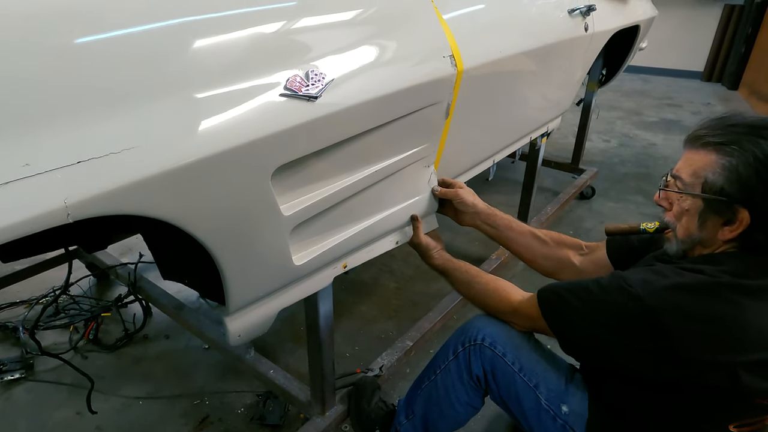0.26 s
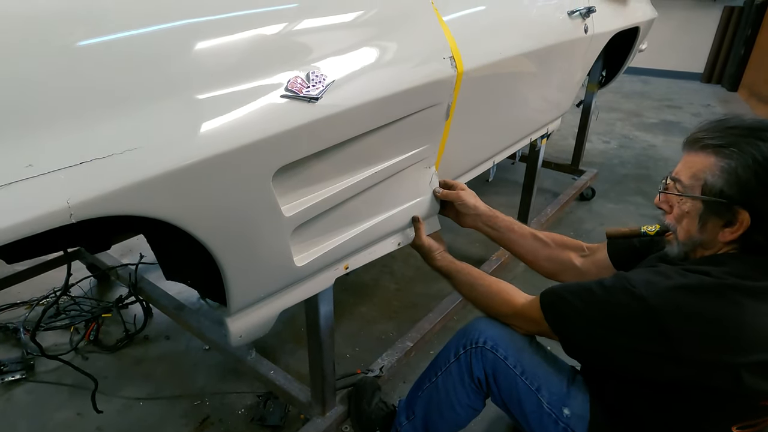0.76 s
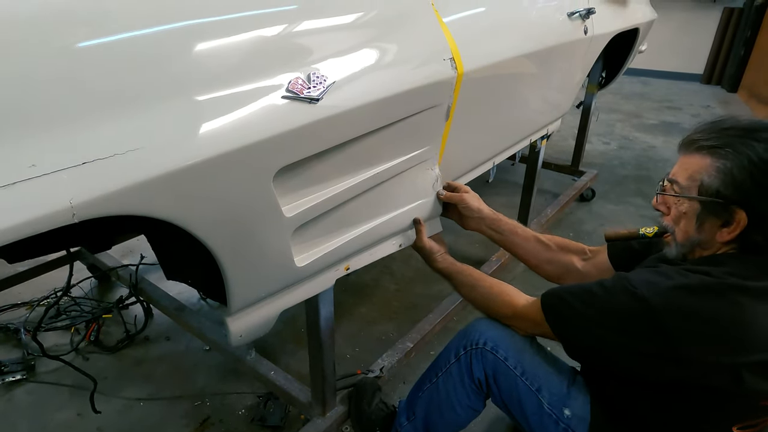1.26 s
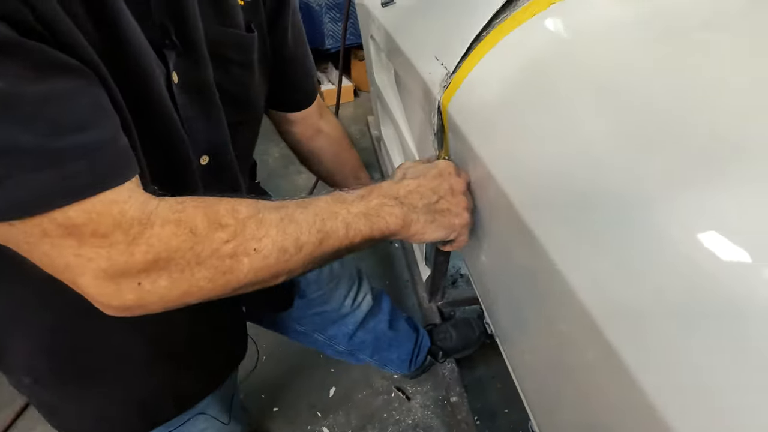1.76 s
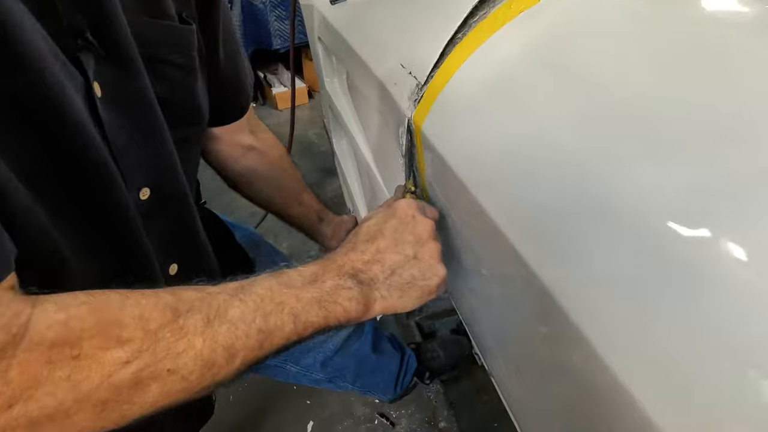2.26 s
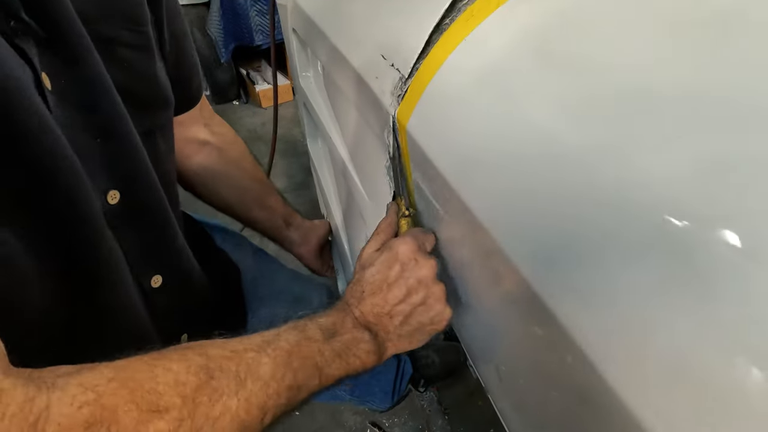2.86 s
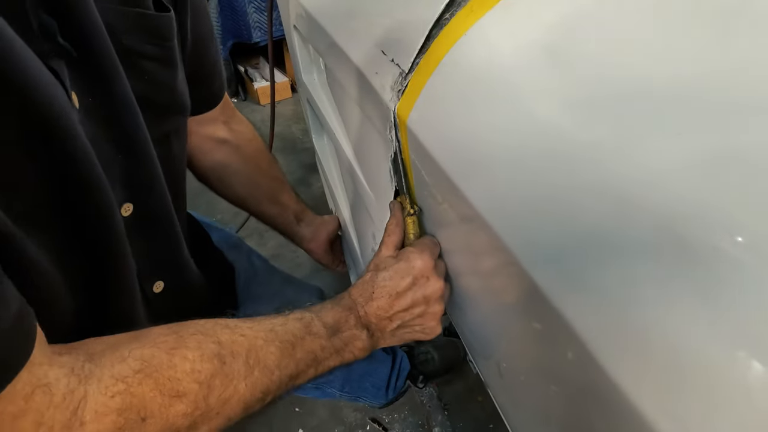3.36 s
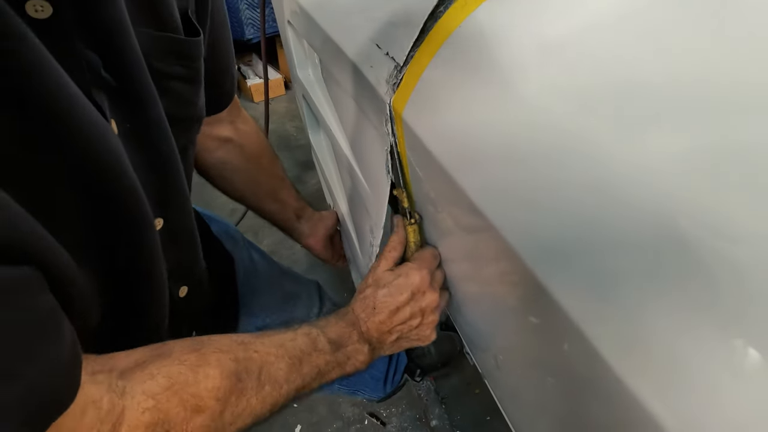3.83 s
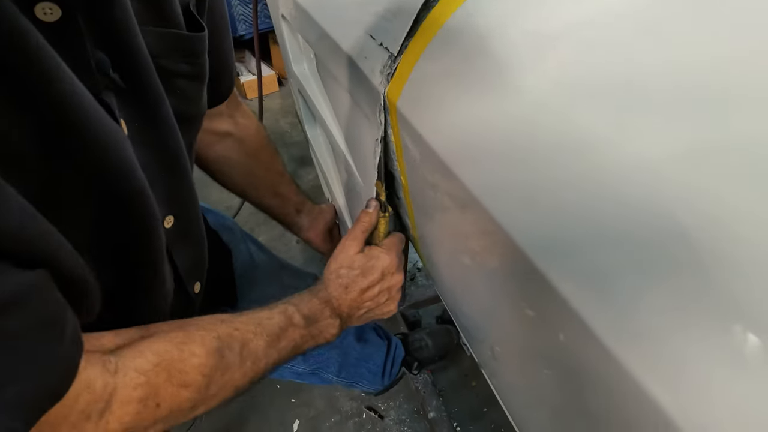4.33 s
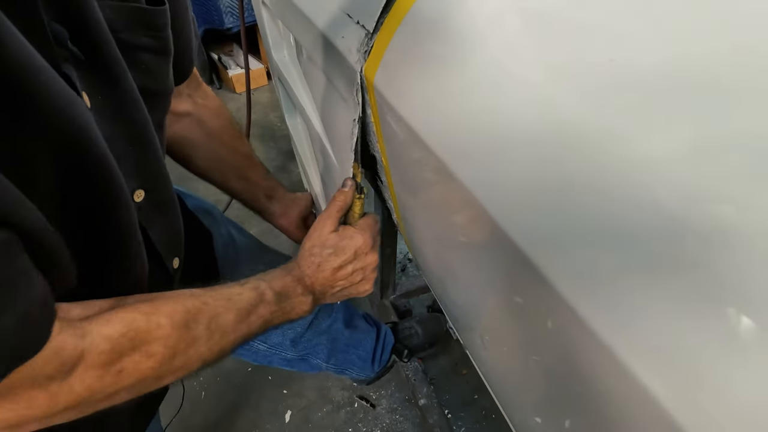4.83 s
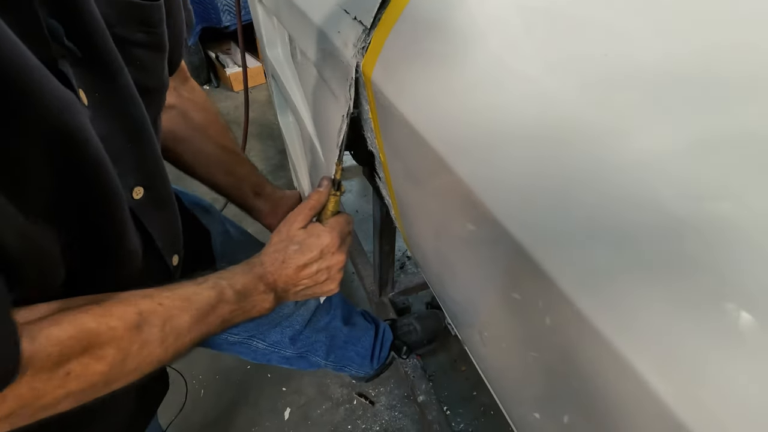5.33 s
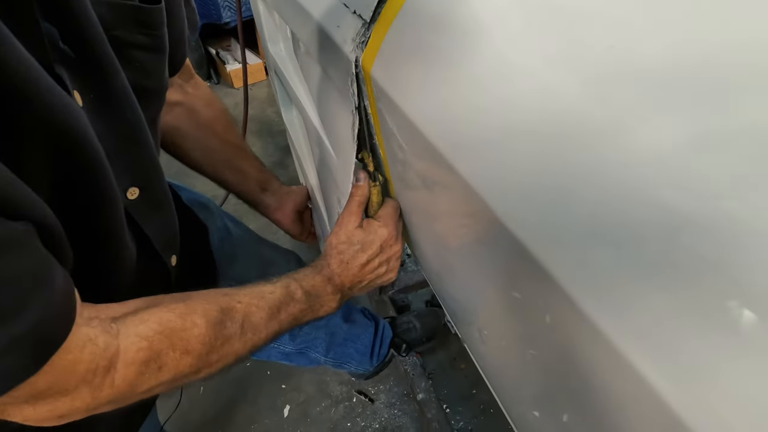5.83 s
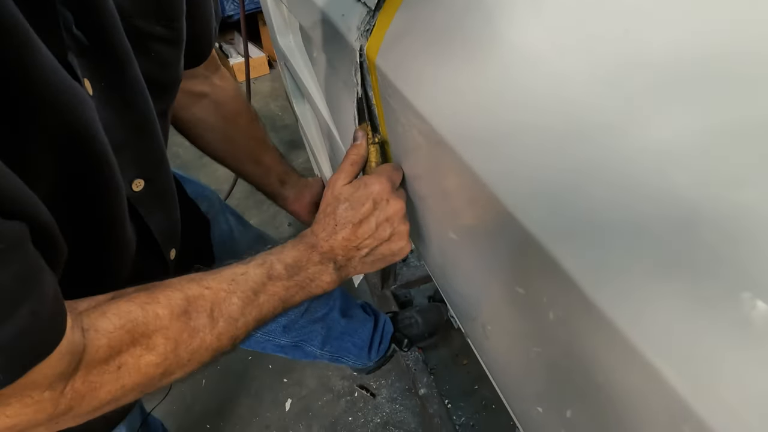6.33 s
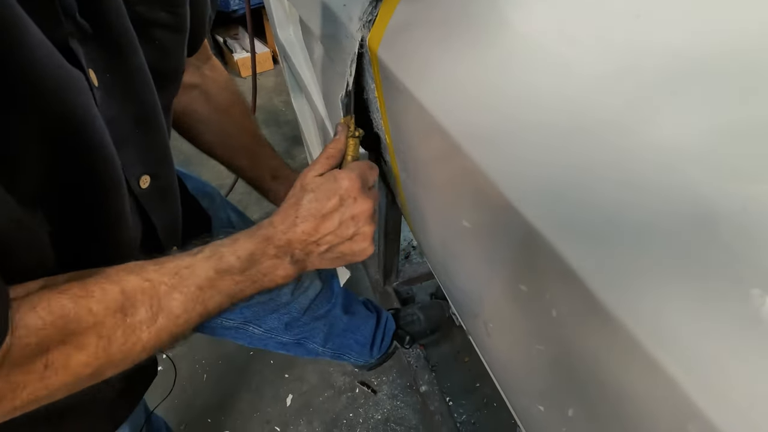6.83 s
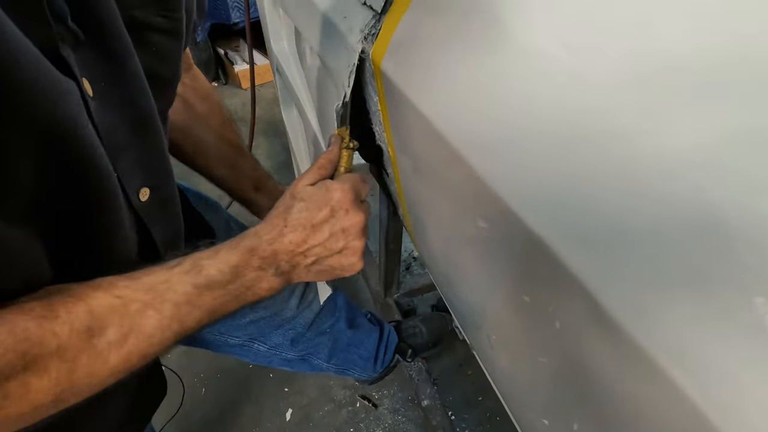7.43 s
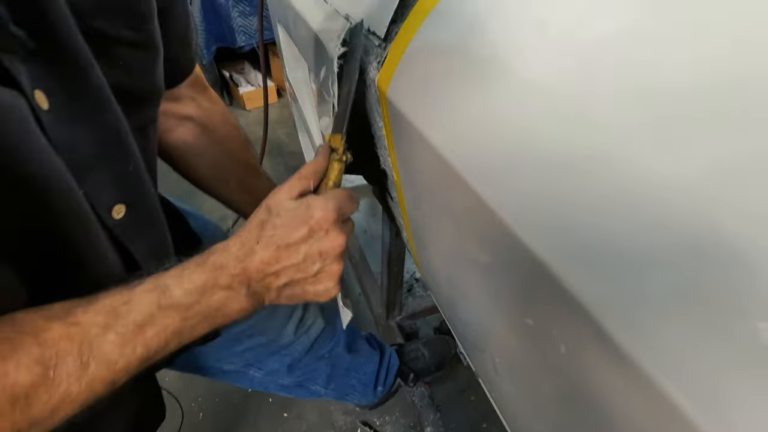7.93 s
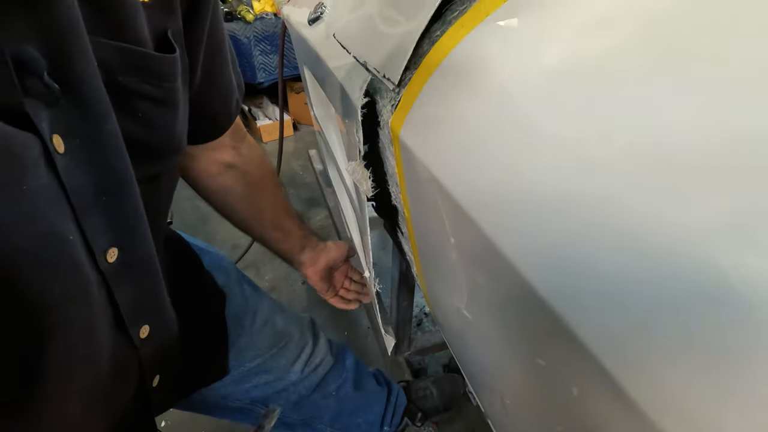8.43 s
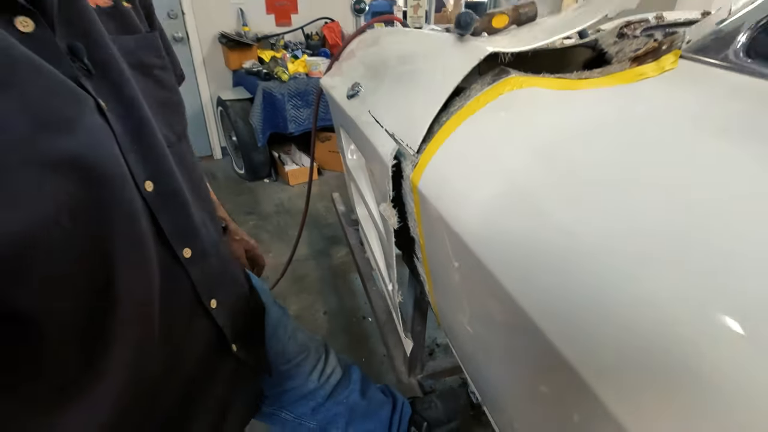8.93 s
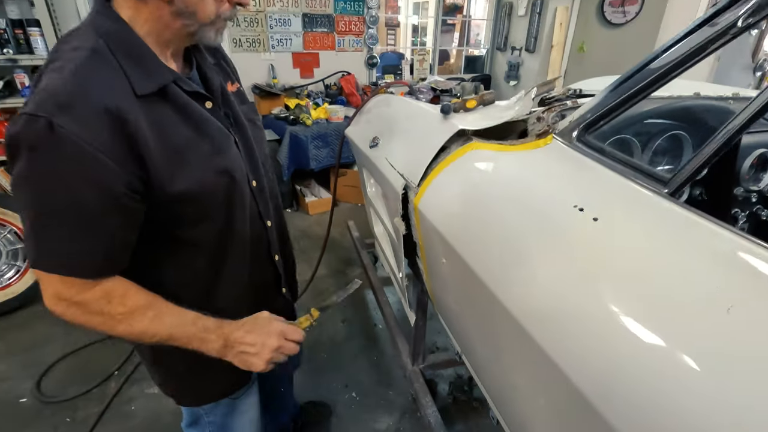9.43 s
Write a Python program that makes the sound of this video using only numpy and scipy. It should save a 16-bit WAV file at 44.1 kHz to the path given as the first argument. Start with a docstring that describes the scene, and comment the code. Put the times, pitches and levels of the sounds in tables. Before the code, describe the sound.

A glued fibreglass car panel is pulled by hand in a hard-floored workshop. First, rhythmic ripping cracks and dull shell knocks come from across the floor, cutting off abruptly. After a tiny silence the microphone is close: quiet creaks and fibre ticks, then hard dry snaps, more creaking, a violent break with hollow thumps, and finally soft cloth brushing, low room rumble and a faint climbing hum.

```python
"""Workshop: a glued fibreglass body panel is pried off along its seam. The first pulls are heard from across
the floor and break off abruptly at 1.46 s; after a brief silence the scene changes and the rest is close by.
Rips and frays are random fibre breaks; snaps, knocks and bright ticks are decaying shell modes plus coloured
noise; creaks are stick-slip impulses. Cloth strokes, room air with a steady machine line and, late on, a faint
climbing hum like a far engine."""
import sys
import numpy as np
from scipy import signal
from scipy.fft import rfft, irfft
from scipy.io import wavfile
from scipy.ndimage import uniform_filter1d

SR = 44100
rng = np.random.default_rng(int(sys.argv[2]) if len(sys.argv) > 2 else 0)


def to_wav(sig):
    """Store sig (one row per channel, or 1-D mono) as 16-bit WAV at the path in sys.argv[1].

    Samples outside -1..1 are clipped; the rate is SR.
    """
    pcm = np.clip(np.atleast_2d(sig), -1, 1) * 32767
    pcm = np.round(pcm).astype(np.int16)
    wavfile.write(sys.argv[1], SR, pcm.T)  # frames by channels


N = 426888
TIME = np.arange(N) / SR
RING = TIME[:SR // 3]  # time axis of one event
# shell registers: (low f/Hz, high f/Hz)
THUD, BODY, CRACK, SPLINTER = (130, 250), (250, 700), (700, 2500), (2500, 17000)
FAR_END_S, NEAR_START_S = 1.463, 1.495
# table levels are nominal: trims in the functions and the mix come on top


def undb(db):
    """Decibels to gain."""
    return 10 ** (np.asarray(db) / 20)


def unit(x):
    """Scale to rms 1."""
    return x / np.sqrt(np.mean(x ** 2))


def crest(x):
    """Scale so that the loudest 4 ms have rms 1."""
    return x / np.sqrt(uniform_filter1d(x ** 2, size=176).max())


def band(x, edges_hz):
    """Causal band-pass: low registers answer later, as bending waves do."""
    return signal.sosfilt(signal.butter(3, edges_hz, "band", fs=SR, output="sos"), x)


def tint(x, colour):
    """Filter x by a gain curve of (f/Hz, level/dB) points, linear in log f."""
    hz, db = np.transpose(colour)
    bins_hz = np.maximum(np.fft.rfftfreq(len(x), 1 / SR), 1)
    gain = undb(np.interp(np.log(bins_hz), np.log(hz), db))
    return irfft(rfft(x) * gain, len(x))


def fade(t_s, t60_s):
    """Exponential decay, 60 dB down after t60_s."""
    return np.exp(-np.log(1000) * t_s / t60_s)


def surge(t_s, length_s, swell_share):
    """Load that builds up exponentially until t = 0, then dies away; length_s = sum of both time constants."""
    return np.exp(np.minimum(t_s / swell_share, -t_s / (1 - swell_share)) / length_s)


def add(out, start_s, x):
    """Mix x into out from start_s on."""
    start = int(start_s * SR)
    x, start = x[max(-start, 0):], max(start, 0)
    out[start:start + len(x)] += x[:N - start]


def fractures(count, per_s, spread_db):
    """Random tiny breaks: many small, a few large."""
    size = undb(spread_db * np.minimum(rng.exponential(size=count), 4))
    hits = rng.random(count) < per_s / SR
    return hits * size * rng.choice([-1, 1], count)


def wander():
    """Slow chance with spread 1."""
    return unit(tint(rng.standard_normal(N), [(1, 0), (8, 0), (30, -80)]))


# room noise colour: f/Hz, level/dB
ROOM_COLOUR = [(15, -42), (25, -4.5), (64, 4.5), (130, -0.5), (256, -6), (354, -15.5), (416, -9),
               (489, -15.5), (1940, -26), (3340, -32), (5430, -33), (8140, -39), (11900, -37.5),
               (16000, -51)]
# steady machine lines: f/Hz, rms level/dB
MACHINE_LINES = [(86.1, -63.5)]


def air():
    """Uneven low rumble and thin hiss of the room, with a steady machine line."""
    lines = 0
    for hz, db in MACHINE_LINES:
        lines = lines + undb(db) * np.sqrt(2) * np.sin(2 * np.pi * (hz * TIME + rng.random()))
    noise = unit(tint(rng.standard_normal(N), ROOM_COLOUR))
    return undb(-56 + 0.86 * wander()) * noise + lines


# glue line rips: t/s of load peak, splinter level/dB, depth/dB = body re splinter, load length/s
GLUE_RIPS = [(0.009, -26.5, 6.5, 0.039), (0.226, -35.5, 9, 0.035), (0.479, -33, 5.5, 0.016),
             (0.702, -19.5, 9.5, 0.017), (0.96, -28, 3.5, 0.013), (1.207, -19, 10, 0.019),
             (1.442, -21, 13.5, 0.015), (2.362, -33, 9, 0.017), (4.338, -46.5, 13, 0.018),
             (4.576, -38.5, 11.5, 0.032), (4.986, -37, 4, 0.028), (5.026, -33, 11, 0.026),
             (5.17, -39, 4.5, 0.02), (5.365, -31.5, 8, 0.034), (5.421, -41.5, 22.5, 0.016),
             (5.603, -40, -5, 0.05), (7.037, -35.5, -2, 0.02), (7.064, -38.5, -0.5, 0.032),
             (7.251, -31, -3.5, 0.029), (7.434, -28, -2, 0.029), (7.589, -26, -2, 0.029),
             (7.761, -14.5, -2.5, 0.025), (7.794, -35, 24, 0.023), (7.959, -39.5, 25, 0.035)]
# fibre break colour: f/Hz, level/dB
FIBRE_COLOUR = [(120, -31.5), (200, 3), (558, -8.5), (659, -3), (777, -8), (1300, 4.5), (1650, 3),
                (2290, -4.5), (2650, -8.5), (3020, -9), (4600, -7.5), (8420, -17.5), (12200, -18),
                (16000, -30)]
RIP_SWELL_SHARE = 0.46  # part of the load length spent building up
RIP_CRACK_SHARE = 0.64  # part of the depth that also lifts the crack register


def rips(start_s, end_s):
    """Crack runs along the glue: an avalanche of fibre breaks swells and dies; a deep one shakes the shell too."""
    out, t_s = np.zeros(N), RING - RING[-1] / 2
    for s, db, depth_db, length_s in GLUE_RIPS:
        if start_s <= s < end_s:
            fibres = tint(fractures(len(t_s), per_s=3200, spread_db=4.5), FIBRE_COLOUR)
            fibres = fibres * surge(t_s, length_s, RIP_SWELL_SHARE)
            registers = [(SPLINTER, -1.5), (CRACK, RIP_CRACK_SHARE * depth_db - 2.5), (BODY, depth_db - 5)]
            rip = sum(undb(db + rel_db) * crest(band(fibres, edges)) for edges, rel_db in registers)
            add(out, s + t_s[0] + .003, rip)
    return out


# large piece gives way: t/s, level/dB
PANEL_FLEXES = [(0.064, -28), (1.207, -25), (1.44, -22), (4.789, -19.5), (5.187, -31.5), (5.386, -29),
                (7.766, -16.5), (7.934, -23), (8.019, -22)]
# slowest bending modes of the panel: nominal f/Hz, level/dB, t60/s
BENDING_MODES = [(50.5, -14.5, 0.14), (90.4, -6, 0.26), (119.3, 2, 0.18)]


def flexes(start_s, end_s):
    """Whole panel springs back in its bending modes, each pitch varied per event."""
    out = np.zeros(N)
    for s, db in PANEL_FLEXES:
        if start_s <= s < end_s:
            flex = 0
            for hz, mode_db, t60_s in BENDING_MODES:
                varied_hz = hz * rng.uniform(0.99, 1.2)
                flex = flex + undb(mode_db) * fade(RING, t60_s) * np.sin(2 * np.pi * varied_hz * RING)
            add(out, s, undb(db) * crest(flex))
    return out


# shell modes before register damping: f/Hz, level/dB, t60/s
SHELL_MODES = [(202.8, 3.5, 0.4), (238, -2, 0.42), (333, -5, 0.063), (399.8, 3.5, 0.41), (497, 0, 0.24),
               (620, -7.5, 0.023), (684, -3.5, 0.068), (928, -9.5, 0.54), (1054, -1.5, 0.97),
               (1230, -8, 0.44), (1430, -7.5, 0.052), (1517, 3.5, 0.23), (1540, -10, 0.096),
               (1760, 3.5, 0.27), (2025, -7, 0.13), (2200, -8, 0.12)]
MODE_RINGS = np.array([undb(db) * fade(RING, t60_s) * np.sin(2 * np.pi * hz * RING)
                       for hz, db, t60_s in SHELL_MODES])
# colour of the dense short modes: f/Hz, level/dB
THICKET_COLOUR = [(29, -37), (50, -12), (408, 3.5), (630, -6.5), (802, -9.5), (1300, -7.5), (1430, -21.5),
                  (1620, -9.5), (2750, -14), (2950, -17.5), (5270, -15), (9410, -25), (11700, -24.5),
                  (14200, -26), (16000, -38)]


def blow(registers, modes_db, contact_hz, spot_hz=6060.0, spot_db=-4.0, spot_t60_s=0.037):
    """One blow on the shell: main modes over a thicket of short ones; registers = (edges/Hz, level/dB, t60/s)."""
    contact = signal.butter(2, contact_hz, fs=SR, output="sos")
    # each blow starts every mode with a random sign, at nearly equal strength
    strengths = rng.uniform(0.99, 1, len(MODE_RINGS)) * rng.choice([-1, 1], len(MODE_RINGS))
    modes = signal.sosfilt(contact, strengths @ MODE_RINGS)
    # the spot struck has a short ring of its own
    spot = np.sin(2 * np.pi * spot_hz * RING) * fade(RING, spot_t60_s)
    thicket = signal.sosfilt(contact, tint(rng.standard_normal(len(RING)), THICKET_COLOUR))
    out = 0
    for edges, db, t60_s in registers:
        part = crest(band(thicket * fade(RING, t60_s), edges))
        part = part + undb(spot_db) * band(spot, edges)
        if edges != SPLINTER:
            part = part + undb(modes_db) * crest(band(modes * fade(RING, 2.6 * t60_s), edges))
        out = out + undb(db) * crest(part)
    return out


# loose shell bumps: t/s, body level/dB, crack re body/dB, spot ring f/Hz
SHELL_KNOCKS = [(0.066, -20.5, -20, 203), (0.125, -28.5, -4, 675), (0.392, -31, -1, 653),
                (0.634, -28.5, 1.5, 647), (0.872, -31, 1, 659), (0.965, -20.5, -37, 213),
                (1.037, -27, 7, 317), (1.074, -25, -2.5, 303), (1.289, -27.5, 3, 250),
                (1.34, -29, -1.5, 525), (1.54, -42, -15, 230), (1.707, -41, -7.5, 206),
                (2.666, -42.5, -3, 335), (3.051, -42.5, -14, 218), (3.75, -36.5, -9, 642),
                (3.96, -37.5, -0.5, 508), (5.723, -39, -4.5, 229), (5.814, -36.5, -4, 298),
                (6.054, -37.5, -10.5, 300), (6.153, -43, -4, 213), (6.326, -34, 1.5, 310),
                (7.441, -32.5, -0.5, 360), (7.822, -18.5, -1.5, 252), (7.85, -20, -6, 260),
                (7.897, -25, -3, 270), (7.936, -8, -19, 443), (7.959, -9.5, -12.5, 312), (8, -18, -11, 470),
                (8.026, -22.5, -10.5, 191), (8.045, -25.5, -8, 185), (8.265, -29.5, -2, 360),
                (9.149, -48.5, -7, 303)]
# a slack spot rings low and thuds, a stiff one hardly does; thud re body
SLACK_HZ, STIFF_HZ, SLACK_THUD_DB, STIFF_THUD_DB = 198, 292, 1.5, -11


def knocks(start_s, end_s):
    """Dull, low-passed blows of the loose shell."""
    out = np.zeros(N)
    for s, db, crack_db, spot_hz in SHELL_KNOCKS:
        if start_s <= s < end_s:
            thud_db = np.interp(spot_hz, [SLACK_HZ, STIFF_HZ], [SLACK_THUD_DB, STIFF_THUD_DB])
            registers = [(THUD, db + thud_db, .13), (BODY, db - 2.5, .1), (CRACK, db + crack_db - 4.5, .07)]
            add(out, s, blow(registers, modes_db=-7, contact_hz=825,
                             spot_hz=spot_hz, spot_db=6.0, spot_t60_s=0.086))
    return out


# thick fibres part one by one: t/s, splinter level/dB
FIBRE_TICKS = [(0.201, -29), (0.23, -26.5), (0.438, -36), (0.451, -36), (0.462, -33), (0.567, -40),
               (0.687, -25), (0.995, -37), (1.191, -21.5), (1.98, -45), (2.065, -43.5), (2.576, -51.5),
               (2.828, -46), (2.849, -44.5), (2.883, -48), (3.122, -41), (3.285, -46.5), (3.423, -42),
               (3.863, -43.5), (3.915, -38.5), (3.942, -41), (4.306, -33), (4.527, -39.5), (4.58, -29),
               (4.592, -25), (4.775, -29), (4.785, -22.5), (4.879, -35.5), (4.924, -41.5), (5.018, -32),
               (5.145, -34.5), (5.583, -32.5), (7.028, -35.5), (7.059, -29), (7.113, -41.5), (7.18, -36),
               (7.186, -38), (7.223, -34), (7.546, -41), (7.672, -34.5), (7.692, -39.5), (7.937, -31.5),
               (7.958, -30.5)]


def ticks(start_s, end_s):
    """Single fibre breaks: short bright blows without thud or body."""
    out = np.zeros(N)
    for s, db in FIBRE_TICKS:
        if start_s <= s < end_s:
            registers = [(CRACK, db - 6, .035), (SPLINTER, db - .8, .02)]
            add(out, s, blow(registers, modes_db=2.5, contact_hz=16200))
    return out


# bond lets go: t/s, crack level/dB, body re crack/dB, splinter re crack/dB, spot ring f/Hz
BOND_SNAPS = [(0.701, -17, -2.5, -5.5, 1195), (1.202, -15, 7, -15, 2100), (1.225, -20.5, 4.5, -4.5, 2010),
              (1.44, -17, 3, -20, 930), (1.905, -27, -0.5, -4, 1070), (2.019, -34.5, -0.5, -8.5, 1830),
              (2.354, -23.5, 0.5, -3.5, 2030), (2.774, -28, -4, 0, 1730), (4.154, -35, 5, -0.5, 1465),
              (4.274, -14.5, -7.5, -7.5, 1637), (4.372, -34, -1, -1, 1970), (4.563, -22.5, -2, -5.5, 1680),
              (4.792, -10.5, 2.5, -9, 1528), (5.036, -21.5, -0.5, -5, 2010), (5.186, -13, 6, -8, 1630),
              (5.223, -11, 0.5, -7.5, 1905), (5.389, -12.5, 0, -2.5, 1634), (5.601, -36, -2, 10, 1670),
              (6.386, -36, 7, -8.5, 1595), (6.886, -32.5, -9.5, -5.5, 1790), (7.761, -12, -3.5, -9, 1230),
              (7.769, -11, 6, -6.5, 1236), (7.781, -13.5, -8, -6.5, 1710), (7.79, -7.5, -8, -4, 1680)]
# thud re crack: the whole panel is heard from afar, only the seam from close by
FAR_THUD_DB, NEAR_THUD_DB = -3, -21.5
# a violent snap is damped by the break it makes: factors on crack and splinter t60
WEAK_SNAP_DB, STRONG_SNAP_DB, WEAK_RING, STRONG_RING = -31.5, -16, 1.1, .8


def snaps(start_s, end_s, thud_db):
    """Bond breaks as a full-range blow; frayed fibres keep parting for a moment after."""
    out = np.zeros(N)
    for s, db, body_db, splinter_db, spot_hz in BOND_SNAPS:
        if start_s <= s < end_s:
            ring = np.interp(db, [WEAK_SNAP_DB, STRONG_SNAP_DB], [WEAK_RING, STRONG_RING])
            registers = [(THUD, db + thud_db, 0.09), (BODY, db + body_db - 3.5, 0.11),
                         (CRACK, db - .3, 0.048 * ring), (SPLINTER, db + splinter_db - .3, 0.035 * ring)]
            add(out, s, blow(registers, modes_db=-4, contact_hz=16700,
                             spot_hz=spot_hz, spot_db=5.5, spot_t60_s=0.03))
            fray = tint(fractures(len(RING), per_s=300, spread_db=3.0), FIBRE_COLOUR)
            fray = crest(band(fray, (900, SPLINTER[1])) * fade(RING, .25))
            add(out, s, undb(db + splinter_db - 15) * fray)
    return out


# pushes bend the shell and rub it along the seam: t/s of peak, body level/dB, load length/s
SEAM_PUSHES = [(1.083, -42.5, .08), (2.043, -45, 0.15), (2.303, -45, .04), (2.675, -55.5, 0.33),
               (2.829, -39.5, 0.12), (3.08, -48, 0.053), (3.276, -43, 0.13), (3.432, -42.5, 0.043),
               (3.575, -46.5, 0.042), (3.925, -36.5, .12), (4.14, -43, 0.025), (5.115, -37.5, .05),
               (5.723, -44, .07), (5.967, -49.5, 0.2), (6.226, -41, 0.13), (6.364, -37.5, 0.05),
               (6.495, -46, .14), (7.145, -45.5, 0.046), (7.27, -42.5, 0.12), (7.68, -38, 0.054),
               (8.387, -46, .1)]
# stick-slip colour: f/Hz, level/dB
SLIP_COLOUR = [(88, -43), (150, -1), (328, -1), (422, -4.5), (466, -10), (689, -10), (805, -15),
               (1190, -18), (1660, -11), (2180, -21.5), (4860, -27), (9820, -34.5), (14500, -33),
               (16000, -26)]
PUSH_SWELL_SHARE = 0.53  # part of the load length spent building up
CREAK_CRACK_DB, CREAK_SPLINTER_DB, CRACKLE_DB = -8.5, -14.5, -20  # re creak body


def creaks():
    """Stick-slip of seam, blade and hand on the straining shell, and fine fibre crackle, both following the push."""
    slips = tint(fractures(N, per_s=650, spread_db=4), SLIP_COLOUR)
    catch_ring = rng.standard_normal(len(RING)) * fade(RING, .02)

    def rung(x, edges):
        """Let each break ring briefly, limited to a band."""
        return unit(band(signal.fftconvolve(x, catch_ring)[:N], edges))

    body, crack = unit(band(slips, (170, 700))), unit(band(slips, CRACK))
    splinter = rung(slips, SPLINTER)
    crackle = rung(tint(fractures(N, per_s=110, spread_db=1.5), FIBRE_COLOUR), (1200, SPLINTER[1]))
    effort = sum(undb(db - 3.5) * surge(TIME - s, length_s, PUSH_SWELL_SHARE) for s, db, length_s in SEAM_PUSHES)
    return effort * (body + undb(CREAK_CRACK_DB) * crack + undb(CREAK_SPLINTER_DB) * splinter
                     + undb(CRACKLE_DB) * crackle)


# sleeve brushes the shirt: t/s of peak, level/dB, half length/s (to 1/e)
SLEEVE_STROKES = [(1.77, -68, 0.49), (2.29, -67, 0.16), (6.236, -61, 0.099), (6.496, -58.5, 0.019),
                  (8.396, -60, 0.029), (8.666, -63.5, 0.028), (8.936, -62.5, 0.046)]
# cloth colour: f/Hz, level/dB
CLOTH_COLOUR = [(590, -16), (1000, 10.5), (1870, -10), (2100, -3), (3980, -8), (13100, -37), (14200, -18),
                (16000, -25)]


def sleeve():
    """Soft strokes of cloth on cloth: dense tiny impulses under Gaussian envelopes."""
    threads = tint(fractures(N, per_s=4000, spread_db=3), CLOTH_COLOUR)
    threads = unit(band(threads, (1300, SPLINTER[1])))
    return threads * sum(undb(db) * np.exp(-((TIME - s) / half_s) ** 2) for s, db, half_s in SLEEVE_STROKES)


# two hum climbs, each a list of: t/s, f/Hz, rms level/dB
HUM_CLIMBS = [
    [(7.05, 110.9, -62), (7.06, 110.5, -62), (7.216, 115.2, -48.5), (7.5, 121.6, -52)],
    [(8.45, 120.7, -56), (8.562, 134.2, -54), (8.716, 135, -50.5), (9.68, 156.7, -60)],
]
HUM_EDGE_S, HUM_WAVER_DB, HUM_DB = 0.28, 2.3, -0.5


def hum():
    """One low sine line that climbs slowly, wavers and fades in and out."""
    out = 0
    for climb in HUM_CLIMBS:
        s, hz, db = np.transpose(climb)
        gate = np.clip(1 + np.minimum(TIME - s[0], s[-1] - TIME) / HUM_EDGE_S, 0, 1)
        phase = 2 * np.pi * np.cumsum(np.interp(TIME, s, hz)) / SR
        out = out + gate * undb(np.interp(TIME, s, db)) * np.sin(phase)
    return np.sqrt(2) * undb(HUM_DB + HUM_WAVER_DB * wander()) * out


# reflections off floor and car body: lag/ms, level/dB
REFLECTIONS = [(2.6, -19), (4.3, -18), (7.1, -16), (11.2, -18.5)]


def mirrored(x):
    """Nearby hard surfaces send the treble back a few milliseconds later."""
    bright = band(x, (CRACK[0], SPLINTER[1]))
    out = x.copy()
    for lag_ms, db in REFLECTIONS:
        add(out, lag_ms / 1e3, undb(db) * bright)
    return out


def workshop(x, wet_db, low_t60_s, mid_t60_s, high_t60_s):
    """Diffuse echo, as the large panel radiates differently in every direction:
    each half octave stores the energy it is fed and gives it back as fading noise."""
    edges_hz = 44 * 2 ** (np.arange(18) / 2)
    noise, out = rng.standard_normal(N), x
    gather = np.exp(-1 / (0.0018 * SR))  # first reflections take milliseconds to gather
    for low, high in zip(edges_hz, edges_hz[1:]):
        t60_s = np.interp(np.log(low), np.log([150, 1200, 8000]), [low_t60_s, mid_t60_s, high_t60_s])
        keep = fade(1 / SR, t60_s) ** 2
        stored = signal.lfilter([1 - keep], [1, -keep], band(x + 1e-9, (low, high)) ** 2)
        stored = signal.lfilter([1 - gather], [1, -gather], stored)
        out = out + undb(wet_db) * np.sqrt(stored) * unit(band(noise, (low, high)))
    return out


def strikes(start_s, end_s, thud_db):
    """All timed panel events between two times."""
    return (rips(start_s, end_s) + flexes(start_s, end_s) + knocks(start_s, end_s)
            + ticks(start_s, end_s) + snaps(start_s, end_s, thud_db))


# effect of the way across the floor: f/Hz, level/dB
DISTANCE_COLOUR = [(150, 3), (400, 0), (1200, -1), (1900, -2), (5000, -6), (9000, 5), (13000, -6.5),
                   (16000, -5)]


def scene():
    """Pulling by hand from afar; after a brief silence the scene changes to prying close by."""
    rubbing = creaks()
    pulls = tint(strikes(0, FAR_END_S, FAR_THUD_DB) + rubbing, DISTANCE_COLOUR)
    far = workshop(mirrored(pulls), wet_db=-12, low_t60_s=0.44, mid_t60_s=0.54, high_t60_s=0.65)
    far_noise = undb(-51.0) * unit(tint(rng.standard_normal(N), SLIP_COLOUR))
    far = far + far_noise + undb(3.5) * air()
    work = strikes(NEAR_START_S, np.inf, NEAR_THUD_DB) + rubbing + sleeve()
    near = workshop(mirrored(work), wet_db=-15.0, low_t60_s=0.66, mid_t60_s=0.68, high_t60_s=0.79)
    near = near + undb(2.0) * air() + hum()
    before = uniform_filter1d(1. * (TIME < FAR_END_S), size=64)
    after = uniform_filter1d(1. * (TIME > NEAR_START_S), size=64)
    return (far * before + near * after)[None]


def record(dry):
    """The deepest bass is lost, the loudest peaks are rounded and the top is cut."""
    lean = signal.sosfilt(signal.butter(2, 28, "high", fs=SR, output="sos"), dry)
    rounded = np.tanh(.8 * lean) / .8
    return signal.sosfilt(signal.ellip(8, .2, 80, 16000, fs=SR, output="sos"), rounded)


dry = scene()
out = record(dry)
to_wav(out)
```